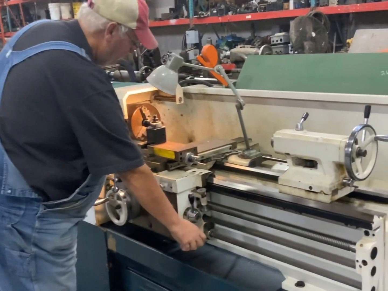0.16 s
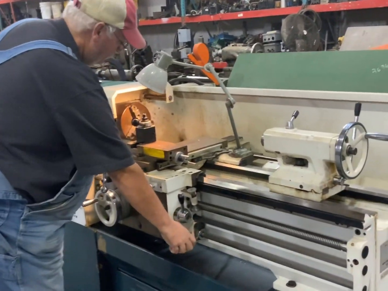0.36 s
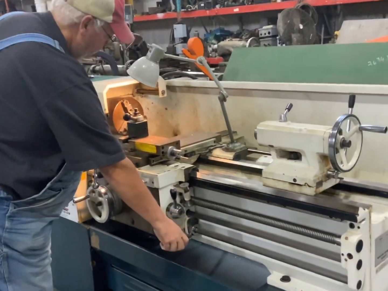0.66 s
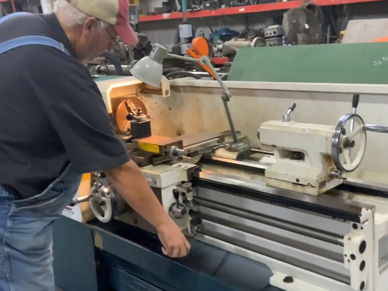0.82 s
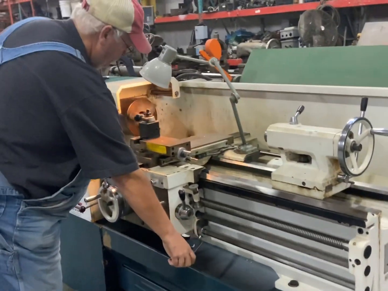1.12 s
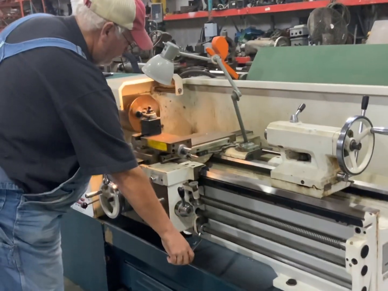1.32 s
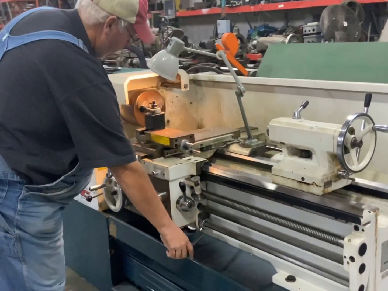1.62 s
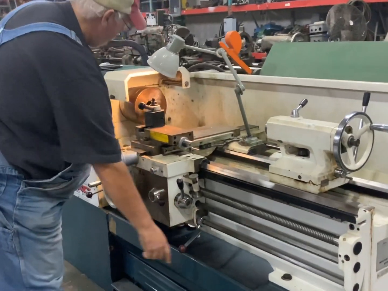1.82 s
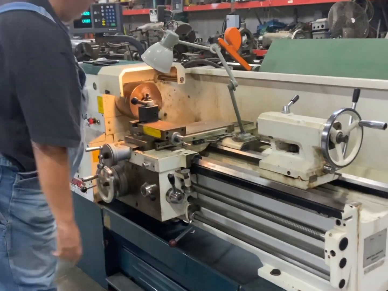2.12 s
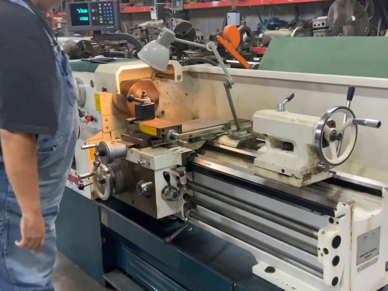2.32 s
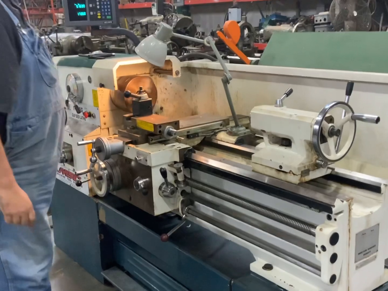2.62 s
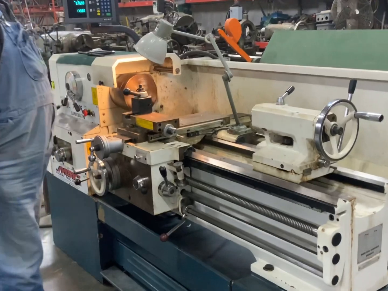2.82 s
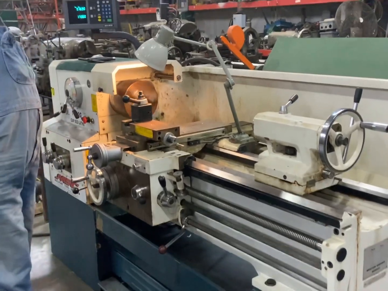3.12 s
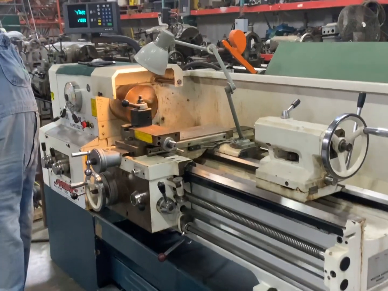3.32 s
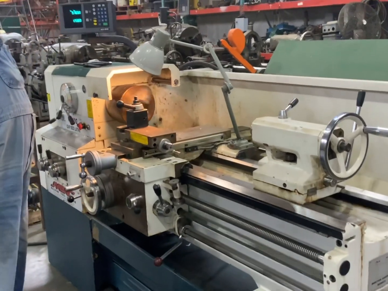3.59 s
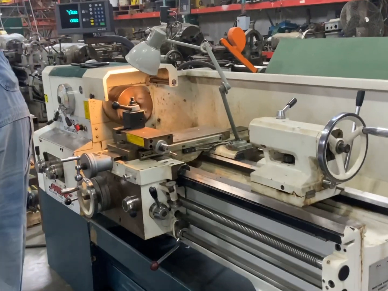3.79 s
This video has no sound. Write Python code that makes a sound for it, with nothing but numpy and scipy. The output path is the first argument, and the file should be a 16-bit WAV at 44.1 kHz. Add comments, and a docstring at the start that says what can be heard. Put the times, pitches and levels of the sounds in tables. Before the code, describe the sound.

Metal lathe spindle engages with a sharp clattering clunk, then gears whine and rumble steadily

```python
"""Metal lathe starting up

A lathe's motor and oil pump already idle in a workshop, heard by a phone's two microphones: coloured noise and
steady tones. The lever clicks, then the clutch slams in with a rattle of blows in the cast headstock, made of
noise crashes and ringing tones. The gear train comes up to speed: rising mesh tones that throb with both shafts,
over a rumble of shaped noise and uneven tooth hits. Someone moves softly nearby."""
import sys
import numpy as np
from scipy import signal
from scipy.fft import rfft, irfft
from scipy.io import wavfile
from scipy.ndimage import uniform_filter1d

SR = 44100
rng = np.random.default_rng(int(sys.argv[2]) if len(sys.argv) > 2 else 0)


def file_out(sig):
    """Save sig as 16-bit WAV at sys.argv[1]."""
    # one column per channel
    cols = np.atleast_2d(sig).T
    # limit, then scale
    lim = np.clip(cols, -1, 1)
    pcm = np.round(lim * 32767).astype(np.int16)
    wavfile.write(sys.argv[1], SR, pcm)


def voltage_ratio(level):
    """Linear amplitude factor for a level in decibels (scalar or array-like)."""
    return 10 ** (np.asarray(level, float) / 20)


N = 174195
T = np.arange(N) / SR  # time, s
F = np.arange(N // 2 + 1) * SR / N + 1e-3  # spectrum axis, Hz; the small offset avoids log(0)
ENGAGE_S = .912  # the clutch closes
MOTOR_HZ, PUMP_HZ = 19.775, 53.04  # shaft speeds before the clutch closes, turns per second
MESH_HZ = 588.9  # gear teeth meeting per second at full speed
RISE_S = 0.0014  # rise time constant of every click, thud and blow


def noise():
    """White noise with an rms near 1."""
    return rng.standard_normal(N)


def over_hz(table, axis=1):
    """Read a table column along the log-frequency axis."""
    table = np.array(table)
    return np.interp(np.log(F), np.log(table[:, 0]), table[:, axis])


def over_s(table):
    """Turn a level curve in dB into a gain over time."""
    return voltage_ratio(np.interp(T, *np.array(table).T))


def level(x, db):
    """Scale a sound to an rms level in dB."""
    return x * voltage_ratio(db) / np.sqrt(np.mean(x ** 2))


def colour(x, table):
    """Shape a sound's spectrum by a table and scale it to rms 1."""
    return level(irfft(rfft(x) * voltage_ratio(over_hz(table)), N), 0)


def band(x, hz, width_hz):
    """Pass a sound through a two-pole resonance."""
    return signal.lfilter(*signal.iirpeak(hz, hz / width_hz, SR), x)


def walk(rate):
    """Smooth random wandering with rms 1; a higher rate (Hz) wanders faster."""
    k = int(SR / rate)
    return level(uniform_filter1d(uniform_filter1d(noise(), k), k), 0)


def rise_and_decay(t, t60_s):
    """Quick rise, then an exponential decay that falls 60 dB in t60_s."""
    return (1 - np.exp(-t / RISE_S)) * np.exp(-np.log(1000) * t / t60_s)


def fading(start_s, t60_s):
    """Silence until start_s, then a quick rise and a decay."""
    return rise_and_decay(np.clip(T - start_s, 0, None), t60_s)


def turns(hz, speed_share):
    """Add up the turns of a shaft whose speed is hz times speed_share."""
    return np.cumsum(hz * speed_share) / SR


def load():
    """Motor speed share: it dips as the clutch drags the spindle up, then settles a little low."""
    lasting_loss, dip, recover_s = .0029, .03, .09  # shares of speed; recovery time constant
    t = np.clip(T - ENGAGE_S, 0, None)
    return 1 - (1 - np.exp(-t / 0.0302)) * (lasting_loss + dip * np.exp(-t / recover_s))


# Spectrum of the motor, fan and shop air
# columns: pitch_hz [Hz], relative level_db [dB per Hz]
IDLE_SPECTRUM = [(25, -22), (40, -12.5), (55, 0.5), (75, 1.5), (110, -0.5), (150, 0), (190, -12),
                 (240, -12.5), (310, -16.5), (390, -7), (480, -18.5), (560, -26), (660, -29), (800, -26),
                 (950, -26), (1100, -24.5), (1300, -9.5), (1450, -17), (1600, -27), (1900, -20),
                 (2150, -27), (2350, -24), (2550, -24), (2800, -20), (3100, -21), (3400, -25.5),
                 (3700, -11.5), (3950, -17.5), (4300, -19.5), (4700, -19), (5100, -20), (5600, -10.5),
                 (6100, -15.5), (6600, -13), (7300, -21), (8200, -17.5), (9300, -17.5), (10500, -20),
                 (11500, -23), (12300, -27), (13500, -32), (15000, -52), (16000, -80)]


def idle_air():
    """Motor, fan and shop air: coloured noise whose octave bands flicker separately."""
    spectrum = rfft(colour(noise(), IDLE_SPECTRUM))
    air = 0
    for low_hz in 20 * 2 ** np.arange(11):
        octave = irfft(spectrum * (F >= low_hz) * (F < 2 * low_hz), N)
        air = air + octave * voltage_ratio(0.93 * walk(12))  # flicker in dB
    return level(air, -41)


# Bands where the motor noise nearly repeats each turn
# columns: pitch_hz [Hz], width_hz [Hz, of each of two filter passes], level_db [dB]
BEARING_BANDS = [(3700, 300, -53), (3506, 130, -57.5), (4637, 220, -59), (1320, 250, -60.5)]


def bearing():
    """Bearing noise: a random pattern replayed each motor turn, partly renewed every time."""
    size, count, warm_up = 2048, 90, 20  # points per turn, turns kept, turns thrown away
    renew = .25  # share of the last turn's pattern lost each turn; fresh noise is added at full weight
    fresh = rng.standard_normal((count + warm_up, size))
    pattern = signal.lfilter([1], [1, renew - 1], fresh, axis=0)[warm_up:].ravel()
    rolling = np.interp(turns(MOTOR_HZ, load()) * size, np.arange(count * size), pattern)
    out = 0
    for hz, width_hz, db in BEARING_BANDS:
        out = out + level(band(band(rolling, hz, width_hz), hz, width_hz), db)
    return out


def tones(table, hz, waver_db):
    """Tones at multiples of a shaft's speed, each wavering in level on its own."""
    turn = turns(hz, load() + .0001 * walk(2.8))
    out = 0
    for multiple, db in table:
        wave = np.sin(2 * np.pi * (multiple * turn + rng.random()))
        out = out + np.sqrt(2) * voltage_ratio(db + waver_db * walk(2.9)) * wave
    return out


# Motor tones
# columns: multiple [shaft speeds], level_db [dB before the shared trim and wavering]
MOTOR_TONES = [(169.8, -64), (178, -62), (184, -56), (185, -52), (186, -58), (187, -60), (190.87, -56),
               (193, -56), (194.1, -59), (196.1, -62)]


def motor_tones():
    """High motor tones tied to its shaft, so they sag when the clutch loads it."""
    return voltage_ratio(-0.94) * tones(MOTOR_TONES, MOTOR_HZ, waver_db=3)


# Oil pump tones
# columns: multiple [shaft speeds], level_db [dB before wavering]
PUMP_TONES = [(3, -57.5), (5, -62), (6, -67), (7, -56), (9, -59.5), (15, -72), (21, -66), (23, -75),
              (24, -59), (25, -56.5), (26, -63), (27, -57), (30, -65), (33, -73), (36, -75), (39, -65),
              (42, -74)]


def pump():
    """Oil pump tones at multiples of its shaft speed, which sags along with the motor."""
    return tones(PUMP_TONES, PUMP_HZ, waver_db=1.0)


# Brief treble rasps, perhaps cloth or a shoe
# columns: start_s [s], length_s [s], level_db [dB at the peak]
RASPS = [(2.17, 0.13, -54), (3.36, .05, -57)]
# Soft low thuds, perhaps steps
# columns: start_s [s], level_db [dB before the rise and decay]
THUDS = [(1.98, -37.5)]


def operator():
    """Someone moving by the machine: swelling bands of hiss and a decaying band of low noise."""
    hiss = level(band(noise(), 13000.0, 7000.), 0)
    boom = level(band(noise(), 72., 25.), 0)
    rasps = sum(voltage_ratio(db) * np.sin(np.pi * np.clip((T - s) / length, 0, 1)) for s, length, db in RASPS)
    thuds = sum(voltage_ratio(db) * fading(s, .5) for s, db in THUDS)
    return rasps * hiss + thuds * boom


# Lever clicks
# columns: start_s [s], level_db [dB before the rise and decay]
LEVER_CLICKS = [(.897, -27), (.902, -27), (0.908, -35)]


def lever():
    """Lever clicks: quick decaying bursts of one broad band of noise."""
    click = level(band(noise(), 3400, 4700.0), 0)
    return click * sum(voltage_ratio(db) * fading(s, 0.084) for s, db in LEVER_CLICKS)


# Clutch and backlash blows
# columns: start_s [s], level_db [dB before the rise and decay], brightness_db [dB, crash treble and ring
# above 800 Hz], weight_db [dB, ring below 250 Hz]
BLOWS = [(.9125, -17.5, 0, -10), (.928, -28.5, 0, -1), (.940, -26.5, -0.5, -3), (.953, -18.5, -2, -2.5),
         (.968, -22, 0, 0), (.986, -23.5, -2, 1.5), (1.000, -26, -4, 5.5), (1.012, -25.5, 1.5, -4),
         (1.022, -21.5, -3, -2), (1.036, -25, -14, -3), (1.050, -25.5, -22, -2), (1.082, -32, -11, 0),
         (1.100, -30, -11, 3), (1.128, -28, -16, -4), (1.155, -30, -14, -9)]
# Ring of the headstock casting
# columns: pitch_hz [Hz before a small random shift], level_db [dB added to the blow], t60_s [s]
CASTING = [(82, -12, 0.24), (189.4, -6, 0.17), (316, -14, .15), (378, -7, 0.11), (447.3, 1, .1),
           (513.3, -1, 0.13), (591, -7, 0.13), (873, -6.5, 0.14), (1067, -9, .12), (1236, -7, .12),
           (1484, -8.5, 0.089), (1624, -13, .1), (2380, -16, 0.089), (3070, -11.5, 0.072)]
# Spectrum of the crash of each blow
# columns: pitch_hz [Hz], relative level_db [dB per Hz]
CRASH_SPECTRUM = [(40, -30), (75, -10), (150, -8), (240, -10.5), (390, -4), (560, -2.5), (800, -5.5),
                  (1100, -10), (1450, -10.5), (1900, -15), (2350, -12), (2800, -21), (3400, -21.5),
                  (3950, -22), (4700, -25.5), (5600, -25.5), (6600, -35), (8200, -24.5), (10500, -56),
                  (12300, -58), (15000, -54)]


def clutch():
    """Clutch and backlash blows: each is a crash of noise plus decaying tones of the casting."""
    crash = colour(noise() * voltage_ratio(2.2 * walk(600)), CRASH_SPECTRUM)  # grainy noise
    dull = signal.lfilter(*signal.butter(1, 900, fs=SR), crash)
    out = np.zeros(N)
    for start_s, db, bright_db, weight_db in BLOWS:
        burst = dull + voltage_ratio(bright_db) * (crash - dull)
        out += voltage_ratio(db - 0.1) * fading(start_s, .15) * burst
        first = int(start_s * SR)
        part = slice(first, first + SR // 2)
        t = T[part] - T[part][0]
        for hz, mode_db, t60_s in CASTING:
            level_chance, pitch_chance = rng.standard_normal(2)
            tilt_db = weight_db if hz < 250 else bright_db if hz > 800 else 0
            gain = voltage_ratio(db + mode_db + 2.7 * level_chance + tilt_db)
            ring = np.sin(2 * np.pi * hz * (1 + .018 * pitch_chance) * t)
            out[part] += gain * rise_and_decay(t, t60_s) * ring
    return out


# The two gears in mesh
# columns: teeth [count], tightest_s [s, a moment of tightest contact], depth [share of level],
# timing_rad [rad], lead_rad [rad, lead of the timing swing]
GEARS = [(58, 2.681, 0.64, 0.24, 1.05), (38, 2.673, 0.49, .13, 2.5)]


def contact():
    """Level and timing swing from the run-out of both gears, at their full-speed turning rates."""
    swing, shift = 1, 0
    for teeth, tightest_s, depth, timing_rad, lead_rad in GEARS:
        angle = 2 * np.pi * MESH_HZ / teeth * (T - tightest_s)
        swing = swing * (1 + depth * np.cos(angle))
        shift = shift + timing_rad * np.sin(angle + lead_rad)
    return swing, shift


# Spectrum of the gear rumble
# columns: pitch_hz [Hz], relative level_db [dB per Hz]
RUMBLE_SPECTRUM = [(40, -15), (75, -21), (150, -11.5), (240, -2.5), (390, -1), (560, -0.5), (800, -6.5),
                   (1100, -6.5), (1450, -7.5), (1900, -11.5), (2350, -7), (2800, -17.5), (3400, -18),
                   (3950, -22), (4700, -26.5), (5600, -23), (6600, -29), (8200, -31), (10500, -26),
                   (12300, -35.5), (15000, -64)]
# Gain of the rumble and panels over time
# columns: time_s [s], level_db [dB]
RUMBLE_LEVEL = [(.91, -54), (1.0, -44), (1.15, -34), (1.4, -32), (2.3, -32.5), (3.0, -32.5), (3.5, -31.5),
                (3.95, -31.5)]
# Headstock panels that the gears shake
# columns: pitch_hz [Hz], width_hz [Hz], level_db [dB, raised by 32 before the rumble gain]
PANELS = [(189.2, 24, -46.5), (228, 14.4, -45), (313, 28, -44), (380.7, 21, -43), (450.3, 19, -47.5),
          (651, 40, -45), (834, 22, -54), (1075, 61, -45.5), (1225, 12, -46.5), (1638, 16, -49.5),
          (1858, 20, -52), (2272, 25, -51.5), (2310, 20, -55), (2380, 47, -44.5)]


def rumble():
    """Gear rumble: dense uneven tooth hits, noise and panel resonances that throb with the gears."""
    is_hit = rng.random(N) < 6000 / SR  # on average 6000 hits per second
    hits = is_hit * noise() * voltage_ratio(1.2 * rng.exponential(size=N))
    gears = colour(level(hits, 0) + 0.65 * noise(), RUMBLE_SPECTRUM)
    panels = sum(level(band(noise(), hz, width_hz), db + 32) for hz, width_hz, db in PANELS)
    swing, _ = contact()
    throb = voltage_ratio(.4 * (swing - 1) + 0.43 * walk(5) + 1.24 * walk(58))
    return (gears + panels) * throb * over_s(RUMBLE_LEVEL) * (T > ENGAGE_S)


# Mesh whine tones
# columns: multiple [mesh speeds], level_db [dB before the swing and whine gain],
# pan_db [dB, left minus right ahead of the microphones' own difference]
MESH_TONES = [(1, -42.5, -8), (2, -37.5, -4), (3, -52, -1), (4, -47, -4.5), (5, -57, 1), (5.98, -58, 2),
              (8, -63, 0)]
# Gain of the whine over time
# columns: time_s [s], level_db [dB]
WHINE_LEVEL = [(1.0, -29), (1.25, -7), (1.5, -1), (2.3, -2.5), (2.55, -1.5), (2.8, 0.5), (3.15, 3),
               (3.4, 1), (3.6, -1.5), (3.95, 3.5)]


def whine():
    """Mesh whine in two channels: tones climb as the gears run up and throb with both shafts."""
    spin_up_s = .07  # run-up time constant
    creep, creep_s = .012, .3  # the last share of speed arrives slowly
    swing, shift = contact()
    t = np.clip(T - ENGAGE_S, 0, None)
    speed_share = 1 - np.exp(-t / spin_up_s) - creep * np.exp(-t / creep_s)
    phase = 2 * np.pi * turns(MESH_HZ, speed_share) + shift + 0.19 * walk(13)
    out = 0
    for multiple, db, pan_db in MESH_TONES:
        wave = np.sqrt(2) * np.sin(multiple * phase + 2 * np.pi * rng.random())
        tone = swing * voltage_ratio(db + 0.99 * walk(11)) * wave
        out = out + tone * voltage_ratio(np.array([[pan_db], [-pan_db]]) / 2)
    return out * over_s(WHINE_LEVEL)


def scatter(x, lags_ms):
    """Reflections from bench and walls: a chain of allpass filters smears the sound in time."""
    impulse = np.arange(SR // 8) == 0
    for ms in lags_ms:
        a = np.zeros(int(ms * SR / 1000) + 1)
        a[0], a[-1] = 1, .55
        x = signal.fftconvolve(x, signal.lfilter(a[::-1], a, impulse))[:N]
    return x


# How the two microphones differ
# columns: pitch_hz [Hz], right_lead_rad [rad], likeness [0-1], left_minus_right_db [dB]
PAIR = [(20, 0, 1, -0.5), (110, -0.2, 1, 0.5), (183, -.14, .99, -.3), (260, -.25, .96, 0),
        (352, -0.9, .9, -1.5), (520, -1.06, .65, 2.5), (680, -1.5, 0.83, 4), (856, -1.8, 0.47, 3),
        (1055, -.4, 0.73, -3), (1300, -0.16, 0.77, -4), (1520, 0.58, 0.72, -3), (1910, 0.96, 0.86, -0.5),
        (2236, 2.5, 0.84, 0), (2470, 3.0, 0.86, 0.5), (2576, 3, 0.89, 0.5), (2763, 4.0, 0.79, -3),
        (3060, 5.5, 0.82, -0.5), (3700, 7, 0.97, -1.5), (4200, 5, 1, 0), (5100, 7.0, 0.64, -1.5),
        (6700, 7.5, 0.78, 0), (7300, 8, 0.8, 0.5), (7970, 8, 0.8, -2), (9200, 10, 0.86, 3),
        (9050, 9.42, 1, 0), (10350, 9.43, 1, 0), (10680, 9.5, 0.89, 3.5), (11400, 9.5, 0.75, -1.5),
        (12060, 11, 0.7, -1), (13000, 12.5, .8, 0), (13300, 13, 1, 0), (20000, 13.5, 1, 2)]


def reflections(broad):
    """Mix the broad sound with separate reflections for each ear where likeness is low."""
    like = np.clip(over_hz(PAIR, axis=2), 0, 1)
    ears = []
    for lags_ms in ([3.1, 7.7, 13.3, 19.1], [4.3, 6.1, 11.9, 21.7]):
        shared = np.sqrt(like) * rfft(broad)
        separate = np.sqrt(1 - like) * rfft(scatter(broad, lags_ms))
        ears.append(irfft(shared + separate, N))
    return np.array(ears)


def ports(left, right):
    """The two microphone ports hear each frequency with their own phase and level."""
    half = voltage_ratio(over_hz(PAIR, axis=3) / 2) * np.exp(-.5j * over_hz(PAIR))
    return np.array([irfft(rfft(left) * half, N), irfft(rfft(right) / half, N)])


def scene():
    """All sources: broad sounds with reflections, tones without, through the microphone ports."""
    broad = idle_air() + bearing() + operator() + lever() + clutch() + rumble()
    steady = motor_tones() + pump()
    left, right = reflections(broad) + steady + whine()
    return ports(left, right)


def low_pass(x):
    """Removes everything above the highest recorded frequency."""
    return signal.sosfilt(signal.butter(12, 15810, fs=SR, output="sos"), x)


def record(dry):
    """The phone's bass cut: a high-pass filter at 47.5 Hz."""
    bass_cut = signal.butter(3, 47.5, "high", fs=SR, output="sos")
    mix = signal.sosfilt(bass_cut, dry)
    return low_pass(mix)


dry = scene()
out = record(dry)
file_out(out)
```